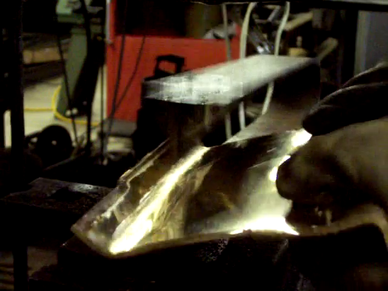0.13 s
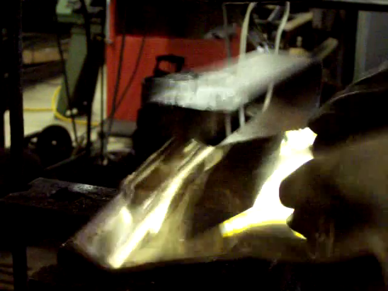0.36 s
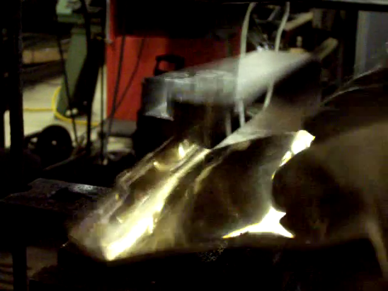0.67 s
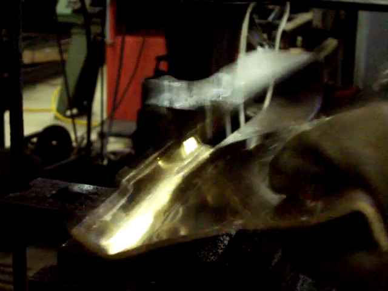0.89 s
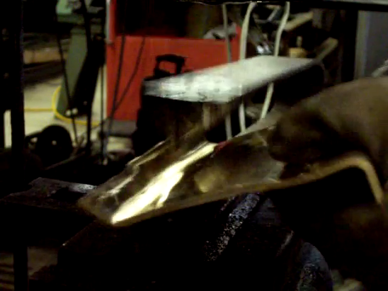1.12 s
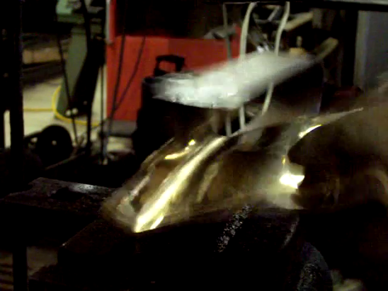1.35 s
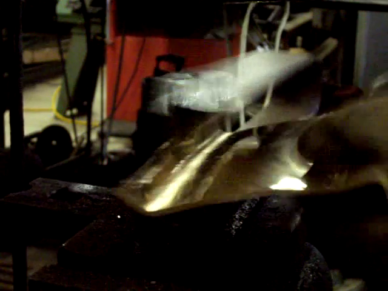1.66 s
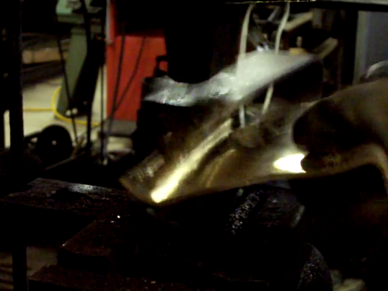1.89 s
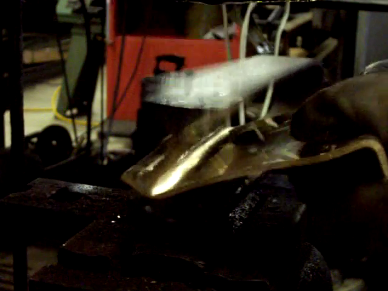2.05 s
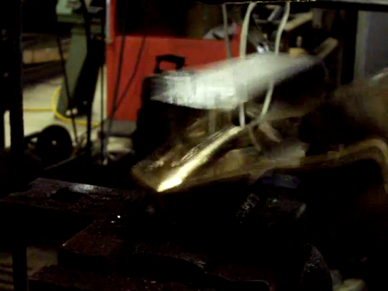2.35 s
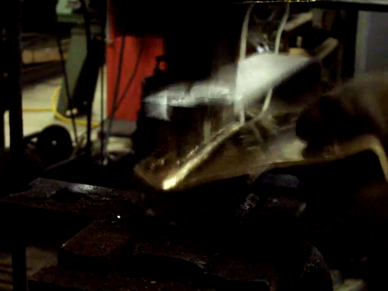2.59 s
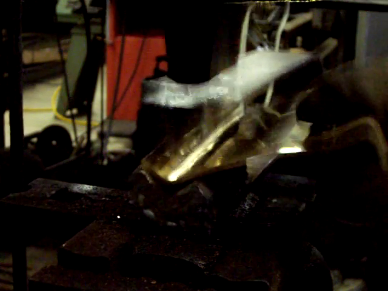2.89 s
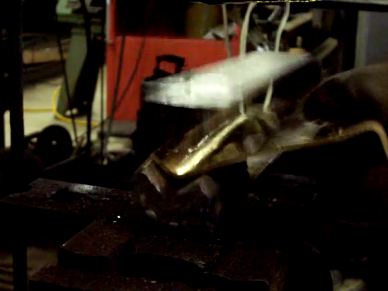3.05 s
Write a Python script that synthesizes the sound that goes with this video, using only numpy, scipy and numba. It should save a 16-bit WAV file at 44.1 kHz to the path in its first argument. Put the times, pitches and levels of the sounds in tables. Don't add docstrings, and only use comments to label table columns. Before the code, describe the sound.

A mechanical trip hammer pounds sheet metal with loud ringing clanks, three blows a second.

```python
import sys
import numpy as np
from scipy import signal
from scipy.fft import rfft, irfft
from scipy.io import wavfile
from scipy.ndimage import uniform_filter1d
from numba import njit

SR = 44100
rng = np.random.default_rng(int(sys.argv[2]) if len(sys.argv) > 2 else 0)


def wav_out(sig):
    wavfile.write(sys.argv[1], SR, np.round(np.clip(np.atleast_2d(sig).T, -1, 1) * 32767).astype(np.int16))


def level_to_linear(level):
    exponent = np.asarray(level, float) / 20
    return 10 ** exponent


N = 142443
PAD = 4410

# (time [s], blow [dB], sheet drum [dB], head ring [dB], block ring [dB])
BLOWS = [
    (0.2663, -1.5, -1, 8.5, 10),
    (0.606, -1.5, -3, -3, 4),
    (0.9323, -1, 8, -23, 6),
    (1.2564, -2.5, 7, -9, -4.5),
    (1.5905, 0, 2.5, 5.5, -30.5),
    (1.923, -0.5, 4, -6, -0.5),
    (2.2478, -0.5, -6, 3, -12.5),
    (2.5686, -2, 3.5, -2, 9),
    (2.9123, -0.5, -2, 1.5, 10.5),
]
# (time [s], blow [dB], sheet drum [dB], head ring [dB], block ring [dB])
EARLIER_BLOW = [
    (-0.066, -2.5, -6.5, 13.5, -15),
]
# (time [s], crack [dB], gain dip after it [dB], head ring [dB], block ring [dB])
REBOUNDS = [
    (.0253, -8, -0.5, 3, -4),
    (.3636, -7.5, -3.5, 2.5, 1.5),
    (0.704, -6, -3.5, 3, 2),
    (1.0306, -6, 1, -2.5, 3),
    (1.3553, -6.5, 0, -3.5, -2),
    (1.6859, -7.5, -3.5, 3.5, -6.5),
    (2.0186, -8, -4.5, -4.5, 3),
    (2.3428, -9, -2.5, -13, -1),
    (2.6663, -8, -3, 3.5, 5.5),
    (3.0106, -7.5, -3.5, -1.5, -5),
]
# (time [s], strength [dB], centre [Hz], steel ring [dB])
TICKS = [(.052, -21.5, 896, -23), (.057, -19.5, 4400, 7), (1.48, -30, 830, -33),
         (2.638, -17.5, 4800, -15.5), (3.156, -32, 3000, -11), (.205, -23, 684, -29),
         (.395, -21, 5400, -43), (.411, -19, 4280, -17), (.545, -32, 620, -35),
         (0.5854, -26.5, 6400, -26.5), (0.8583, -21, 2980, -30), (0.9155, -25, 7200, -28.5),
         (1.1346, -16.5, 2850, -15.5), (1.5273, -18, 3550, 2), (1.72, -16.5, 5372, -6),
         (2.0586, -18.5, 5920, -18.5), (2.188, -26.5, 2810, -22.5), (2.19, -24, 800, -34),
         (2.233, -22, 6950, -39), (2.507, -27.5, 2800, -18), (2.507, -25, 694, -31),
         (2.5531, -25.5, 6950, -33.5), (2.704, -17, 5400, -6), (2.9001, -25, 2770, -12),
         (3.1092, -17.5, 3030, -14.5), (3.109, -22, 4630, -11), (3.15, -25, 790, -40),
         (3.2055, -27, 6780, -33.5)]
# (frequency [Hz]); the first three are sheet drum, head and block
STEEL_HZ = [958, 5372, 6171, 3541, 2175, 2862, 4385, 4816, 5072, 5197, 5798, 6563, 7052, 2390]
# (level [dB], t60 [s])
STEEL = [(-16, 0.62), (-3, 0.66), (-5.5, 0.62), (-6.5, 0.76), (-17, 0.47), (-9.5, 0.5), (-9, 0.43),
         (-13, 0.59), (-29.5, 0.28), (-6, 0.4), (-28.5, 0.3), (-22, .4), (-9.5, 0.85), (-17, 0.7)]
# (frequency [Hz], level [dB], t60 [s])
DRUM = [(1013, -20.5, 0.75), (1090, -21, 0.36), (2904, -15.5, 0.37), (4470, -12, 0.64), (2187, -10, 0.57)]
# (frequency [Hz], density [dB per Hz])
SHEET_COLOUR = [(180, -45), (300, -19.5), (1050, -6.5), (1590, -12), (3210, 0.5), (3490, 1), (4860, -0.5),
                (6310, 6), (8090, -4.5), (10500, -18), (17800, -120)]
# (frequency [Hz], density [dB per Hz])
DRIVE_COLOUR = [(15, -16.5), (25, -16.5), (173, -5), (413, -11), (794, -4.5), (1110, -16), (4110, -15),
                (4420, -5), (8090, -41), (10500, -44), (17800, -120)]
# (frequency [Hz], width [Hz], level [dB])
DRIVE_HUMPS = [(188, 27, -8.5), (501, 23, -1), (818, 43, -6.5), (649, 42, -14)]

STEEL_DB, SHEET_DB, TICK_DB, DRIVE_DB, ROOM_DB = -14.5, -1, 7.5, -28.5, -2.5
SHEET_T60_S, CRACK_T60_S, TICK_T60_S, ROOM_T60_S = 0.04, 0.021, 0.088, 0.51
CHATTER_S, CHATTER_DB = 0.021, -9
REBOUND_RING_DB, REBOUND_SHEET_DB, SETTLE_DB = -3.5, -1.5, -4
HUSH_AFTER_S, HUSH_S = 0.0195, 0.014
LIFT_DB, LIFT_S = 6, 0.087


def colour(table, hz):
    t = np.array(table)
    return np.interp(np.log(hz), np.log(t[:, 0]), t[:, 1])


def chance(rows, count, db):
    c = rng.standard_normal((rows, 2, count))
    return level_to_linear(db * c[:, 0]) * np.exp(2j * np.pi * c[:, 1])


def ring(times, hz, t60, gains, length, rise=0.00035):
    t = np.arange(int(length * SR))[:, None] / SR
    modes = np.exp(t * (2j * np.pi * hz - np.log(1000) / t60)) * (1 - np.exp(-t / rise))
    waves = (gains @ modes.T).imag
    out = np.zeros(N + PAD + len(t))
    for s, wave in zip(times, waves):
        i = max(int(s * SR) + PAD, 0)
        out[i:i + len(t)] += wave
    return out[:N + PAD]


def steel(blows, backs):
    drum, tick = np.array(DRUM), np.array(TICKS)
    hz = np.r_[STEEL_HZ, drum[:, 0]]
    db, t60 = np.r_[STEEL, drum[:, 1:]].T
    count = len(hz)

    struck = chance(len(blows), count, db=1.5) * level_to_linear(blows[:, 1:2] + db)
    struck[:, :3] = struck[:, :3] / np.abs(struck[:, :3]) * level_to_linear(db[:3] + blows[:, 2:])
    struck[:, 14:16] *= level_to_linear(blows[:, 2:3] * 1.6)

    bounced = chance(len(backs), count, db=3.0) * level_to_linear(REBOUND_RING_DB + db)
    bounced[:, 1:3] = bounced[:, 1:3] / np.abs(bounced[:, 1:3]) * level_to_linear(db[1:3] + backs[:, 3:])

    octaves = np.abs(np.log2(hz / tick[:, 2:3]))
    ticked = chance(len(tick), count, db=1.8) * level_to_linear(tick[:, 3:] + db - 10 * octaves)

    times = np.r_[blows[:, 0], backs[:, 0], tick[:, 0]]
    main = np.r_[struck, bounced, ticked]
    twin = main * chance(len(main), count, db=4.5) * level_to_linear(-9)
    third = main * chance(len(main), count, db=4.5) * level_to_linear(-9)
    apart = 1 + 0.0018 * rng.uniform(0.45, 2.47, size=count) * (-1) ** np.arange(count)
    all_hz = np.r_[hz, hz * apart, hz / apart ** 1.7]
    all_t60 = np.r_[t60, t60, t60 * 0.7]
    return level_to_linear(STEEL_DB) * ring(times, all_hz, all_t60, np.c_[main, twin, third], 0.5)


def sheet(blows, backs):
    hz = np.sort(rng.uniform(304.5, 8400, size=160))
    t60 = SHEET_T60_S * level_to_linear(1.09 * rng.standard_normal(len(hz)))
    late = CHATTER_S * np.cumsum(rng.uniform(0.2, 0.54, size=(len(blows), 3)), axis=1)
    chatter_db = blows[:, 1:2] + CHATTER_DB * (1 + late / CHATTER_S)
    times = np.r_[blows[:, 0], (blows[:, :1] + late).ravel(), backs[:, 0]]
    db = np.r_[blows[:, 1], chatter_db.ravel(), backs[:, 1] + REBOUND_SHEET_DB]
    g = chance(len(times), len(hz), db=5.5) * level_to_linear(db[:, None] + colour(SHEET_COLOUR, hz) + SHEET_DB)
    g[-len(backs):] *= level_to_linear(2.3 * np.log2(hz / 5000))
    return ring(times, hz, t60, g / np.sqrt(len(hz) / 2), 0.15)


def cracks(backs):
    hz = np.geomspace(1700, 8300, num=40)
    s = np.r_[backs[:, 0], backs[:, 0] + HUSH_AFTER_S - 0.003]
    db = np.r_[backs[:, 1], backs[:, 1] + SETTLE_DB]
    g = chance(len(s), len(hz), db=2.5) * level_to_linear(db[:, None] + colour(SHEET_COLOUR, hz))
    return ring(s - 0.001, hz, CRACK_T60_S, g / 2, 0.04, rise=0.0014)


def ticks():
    s, db, centre, _ = np.array(TICKS).T
    hz = np.geomspace(200, 8200, num=80)
    octaves = np.abs(np.log2(hz / centre[:, None]))
    g = chance(len(s), len(hz), db=1.5) * level_to_linear(db[:, None] + TICK_DB - 16.9 * octaves)
    return ring(s, hz, TICK_T60_S, g / 3, 0.12)


def walk(rate):
    k = int(SR / rate)
    steps = np.repeat(rng.standard_normal(N // k + 1), k)
    return 1.6 * uniform_filter1d(uniform_filter1d(steps, k), k)[:N]


def drive(blows):
    f = np.maximum(np.fft.rfftfreq(N, 1 / SR), 10)
    humps = sum(level_to_linear(db) * 2 / (1 + (2 * (f - hz) / w) ** 2) for hz, w, db in DRIVE_HUMPS)
    g = level_to_linear(colour(DRIVE_COLOUR, f)) * (1 + humps)
    t, shared = np.arange(N) / SR, walk(24.86)
    lift = 0
    for s in np.r_[blows[:, 0], blows[-1, 0] + 0.33]:
        loading = np.clip((t - s + LIFT_S) / 0.0059, 0, 1)
        letting_go = np.clip((s + 0.032 - t) / 0.0086, 0, 1)
        lift = lift + loading * letting_go
    out = 0
    for lo in 20 * 2.0 ** np.arange(9):
        band = irfft(rfft(rng.standard_normal(N)) * g * (f >= lo) * (f < 2 * lo), N)
        flicker = 1.2 * walk(40) + 0.8 * shared
        out = out + band * level_to_linear(flicker + LIFT_DB * lift * (lo < 1200))
    return level_to_linear(DRIVE_DB) * out / np.std(out)


def shop_echo(x):
    t = np.arange(SR) / SR
    decay = np.exp(-np.log(1000) * t / ROOM_T60_S)
    tail = rng.standard_normal(SR) * decay * (1 - np.exp(-t / 0.018))
    return level_to_linear(ROOM_DB) * signal.fftconvolve(x, tail / np.linalg.norm(tail))[:N + PAD]


def scene():
    blows, backs = np.array(list(EARLIER_BLOW) + list(BLOWS)), np.array(REBOUNDS)
    lines = steel(blows, backs)
    hits = sheet(blows, backs) + cracks(backs) + ticks()
    echo = shop_echo(hits + level_to_linear(-6.5) * lines)
    return ((lines + hits + echo)[PAD:] + drive(blows))[None]


def hush():
    t = np.arange(N) / SR
    s, db = np.array(REBOUNDS)[:, [0, 2]].T
    middle = s + HUSH_AFTER_S + HUSH_S / 2
    return level_to_linear(sum(d * np.exp(-((t - m) / HUSH_S * 2) ** 4) for m, d in zip(middle, db)))


@njit
def follow(x, up, down):
    y, e = np.empty(len(x)), np.mean(np.abs(x[:400]))
    for i in range(len(x)):
        a = abs(x[i])
        e += (a - e) * (up if a > e else down)
        y[i] = e
    return y


def top_cut(x):
    return signal.sosfilt(signal.butter(12, 8240, fs=SR, output="sos"), x)


def record(dry):
    x = dry[0]
    k = int(0.016 * SR)
    late = np.r_[x[:k], x[:-k]]
    attack = 1 / (0.0083 * SR)
    quick = follow(late, attack, 1 / (0.027 * SR))
    slow = follow(late, attack, 1 / (0.2 * SR))
    top = level_to_linear(-14.5)
    x = x * hush() * (top / np.maximum(quick, top)) ** 0.15 * (top / np.maximum(slow, top)) ** 0.38
    x = signal.sosfilt(signal.cheby2(16, 90, 8415 * 1.12, fs=SR, output="sos"), x)
    return top_cut(np.clip(x, -1, 1)[None])


dry = scene()
out = record(dry)
wav_out(out)
```